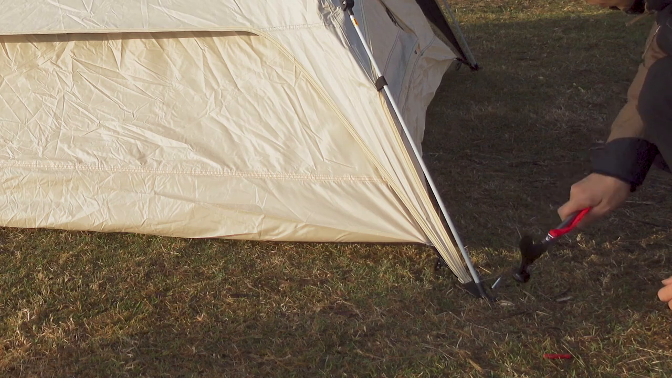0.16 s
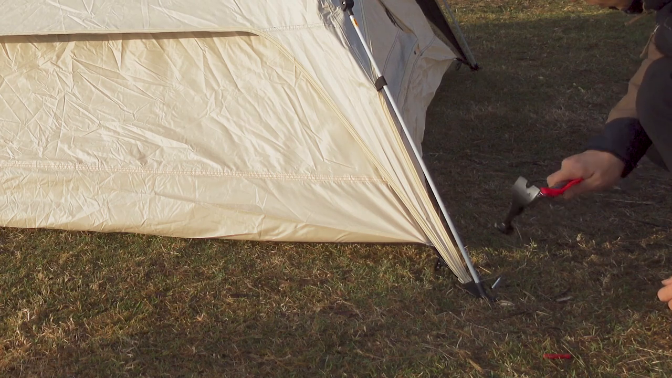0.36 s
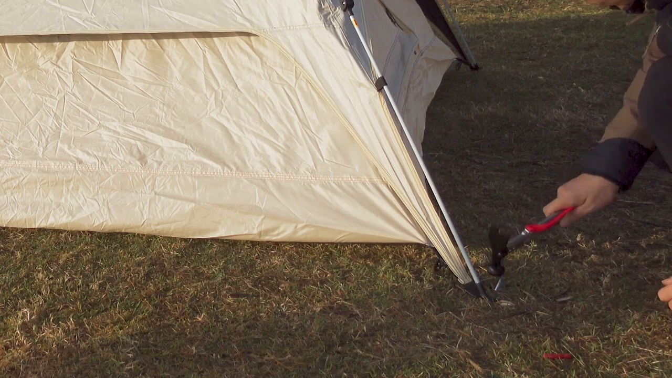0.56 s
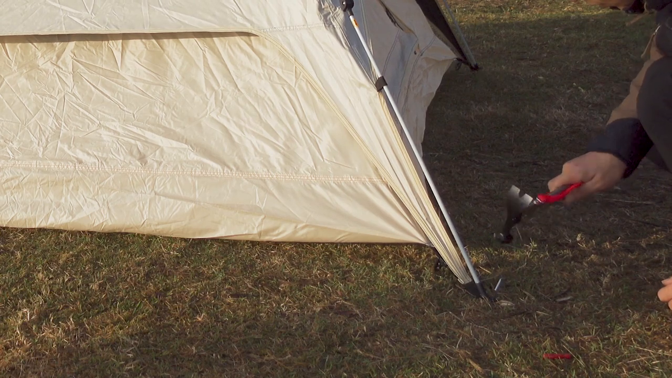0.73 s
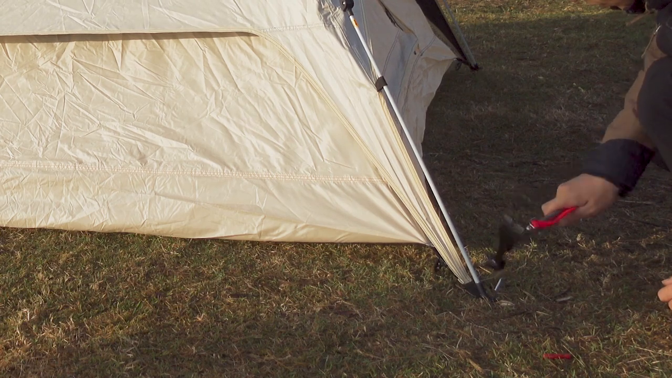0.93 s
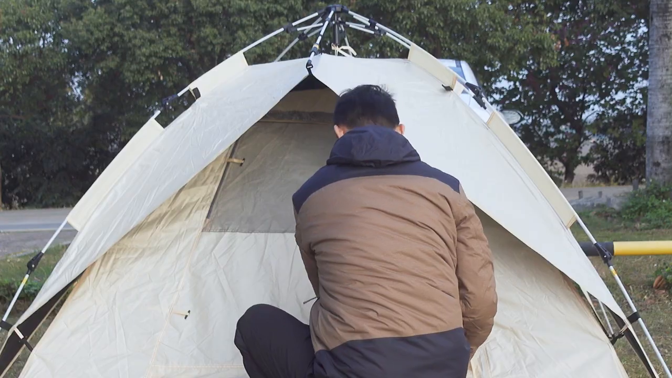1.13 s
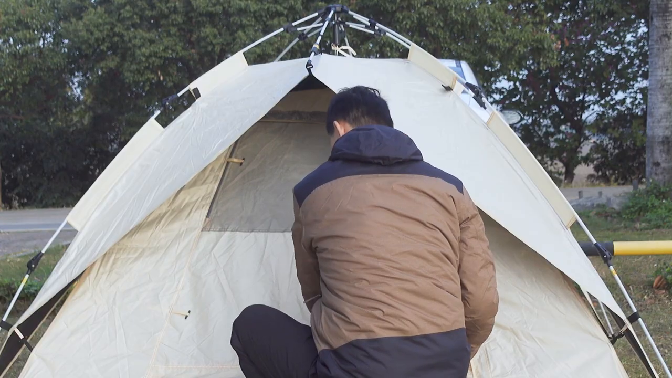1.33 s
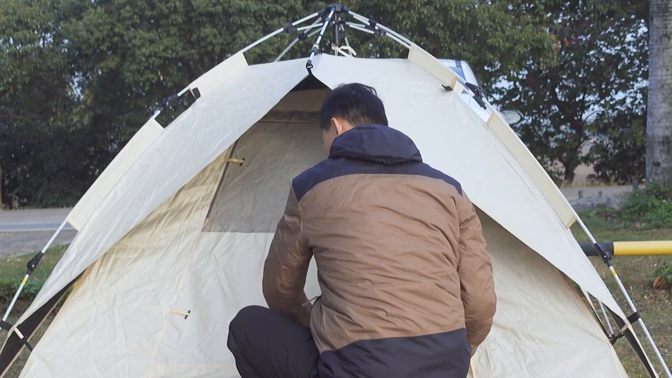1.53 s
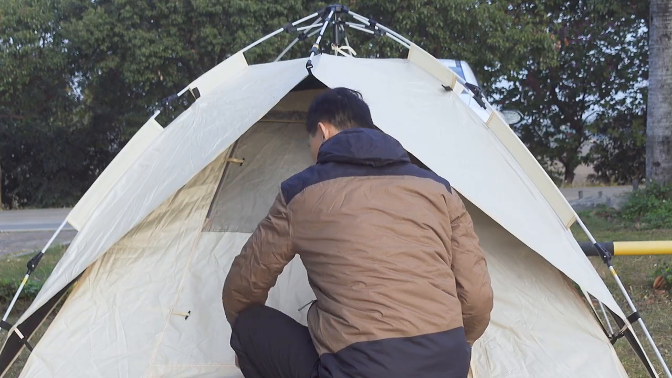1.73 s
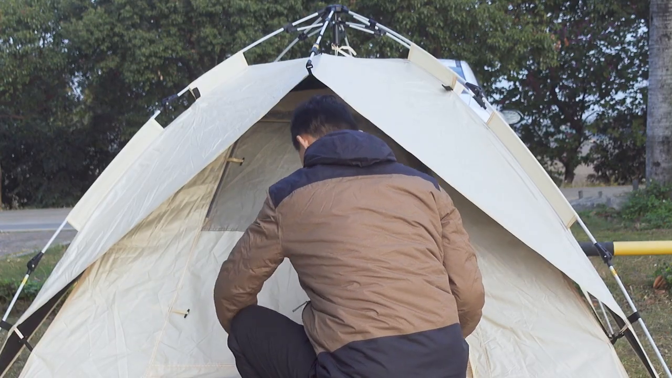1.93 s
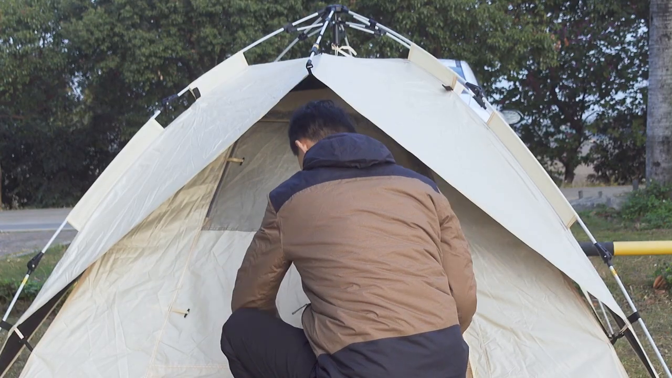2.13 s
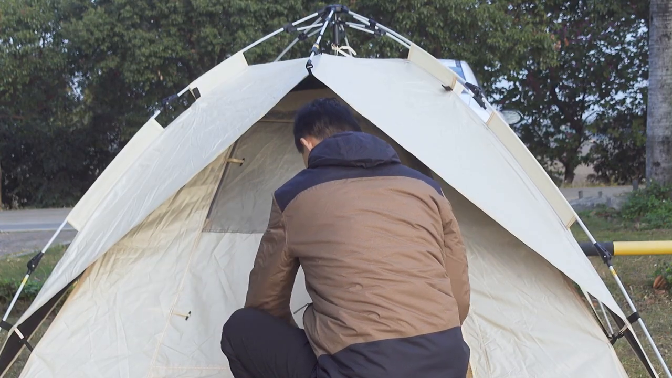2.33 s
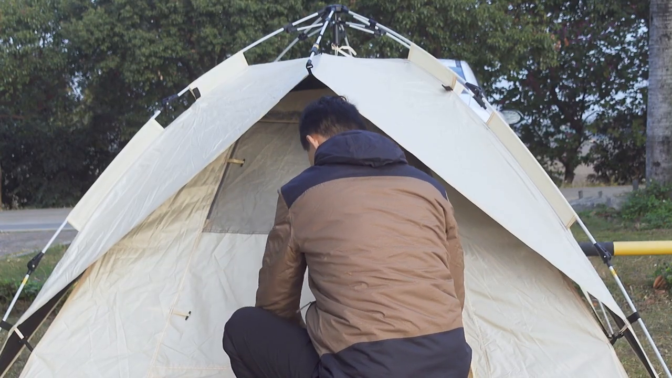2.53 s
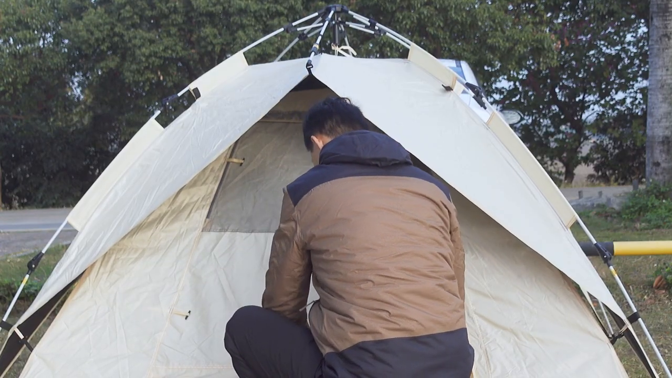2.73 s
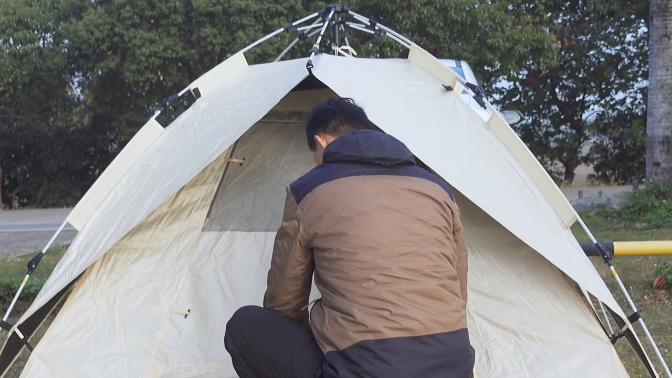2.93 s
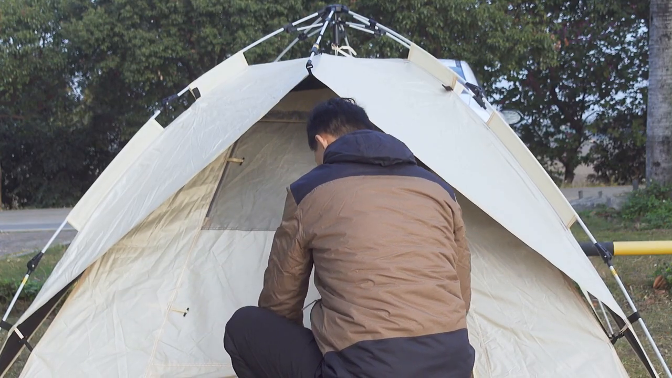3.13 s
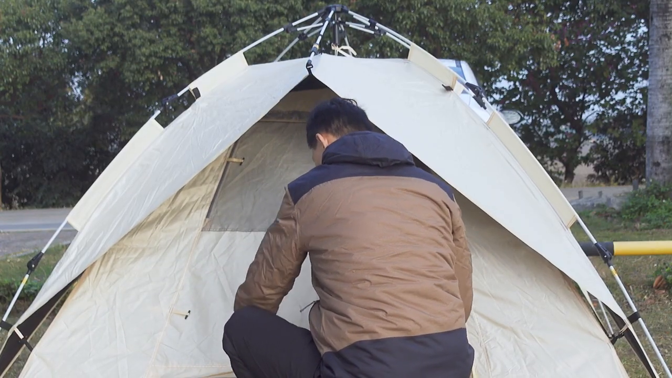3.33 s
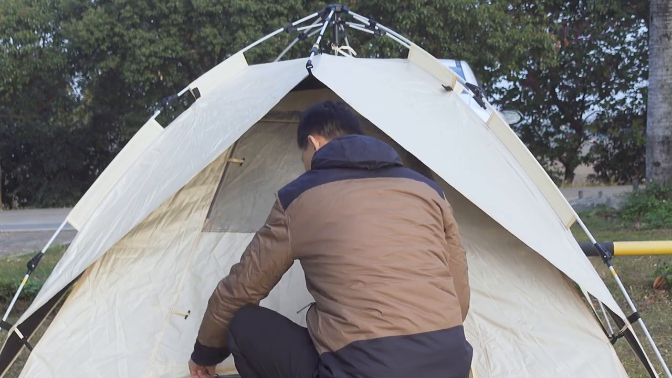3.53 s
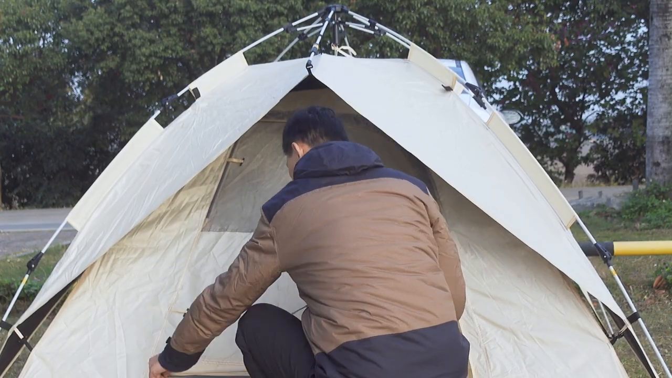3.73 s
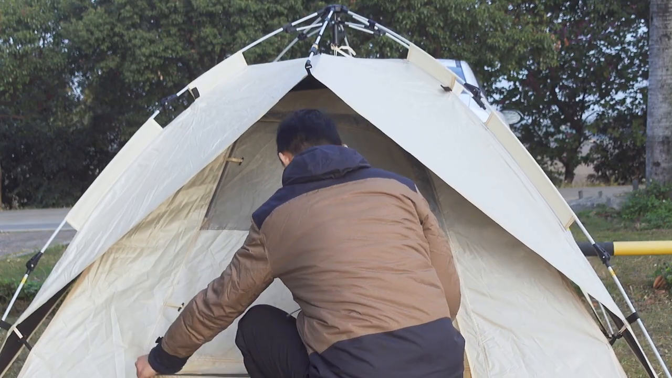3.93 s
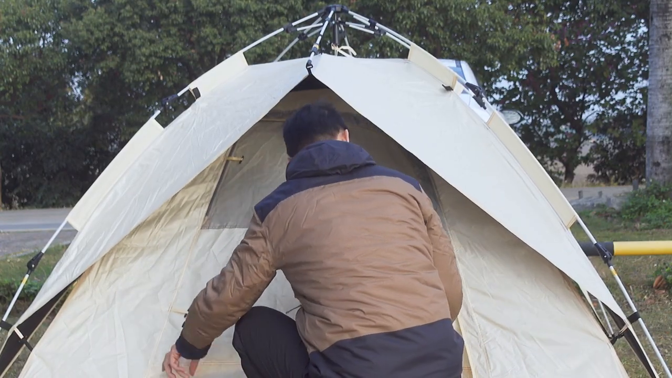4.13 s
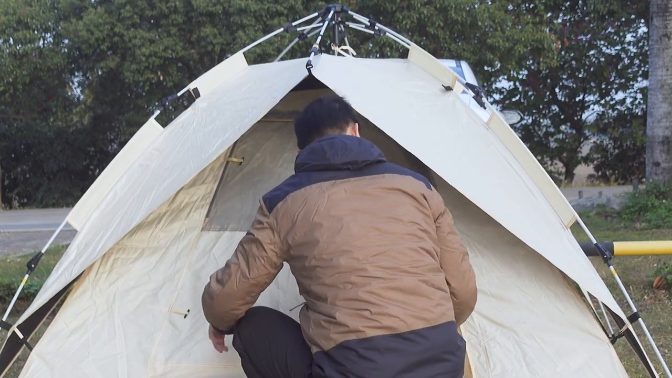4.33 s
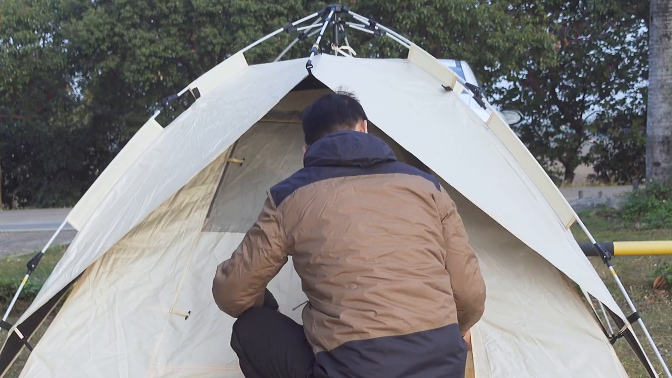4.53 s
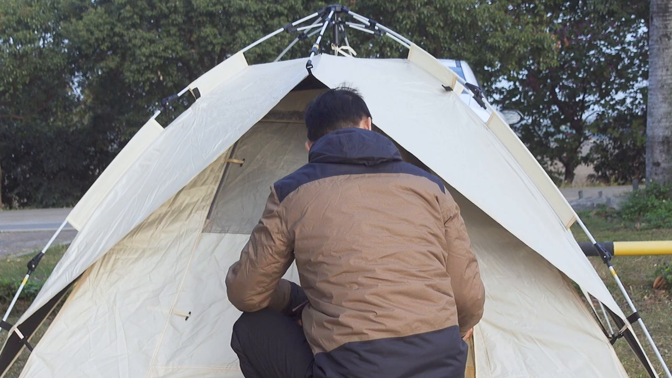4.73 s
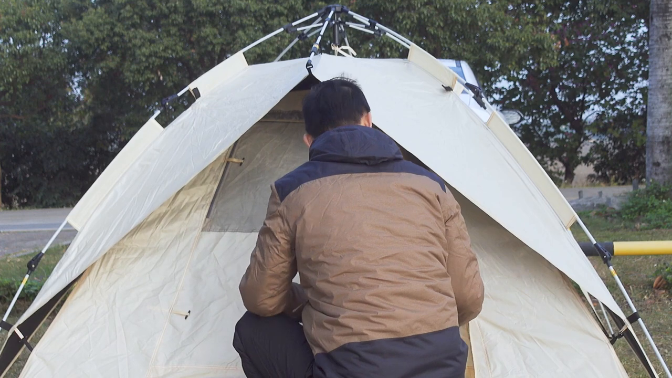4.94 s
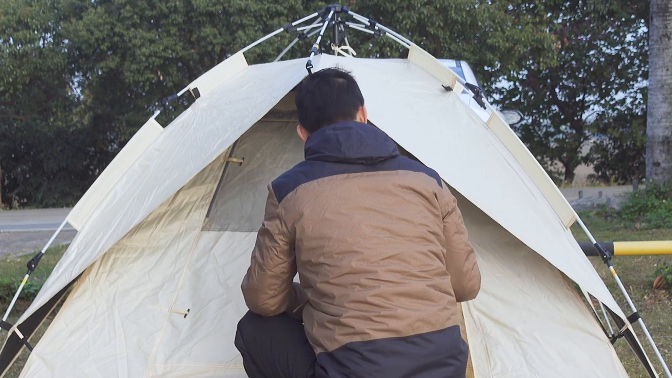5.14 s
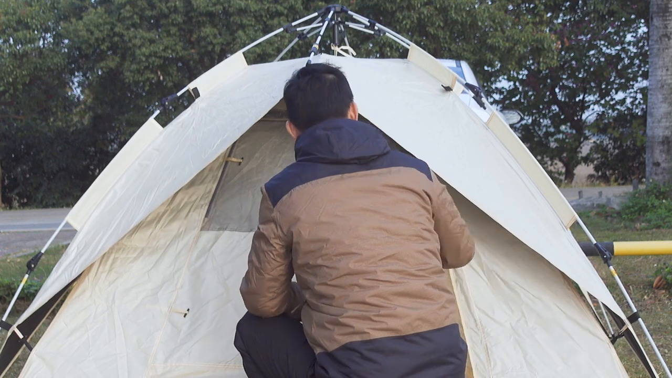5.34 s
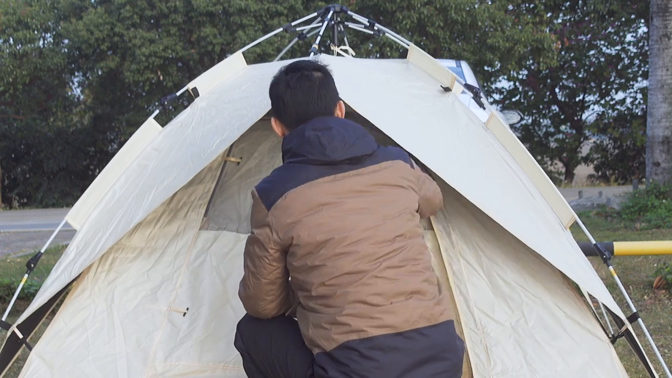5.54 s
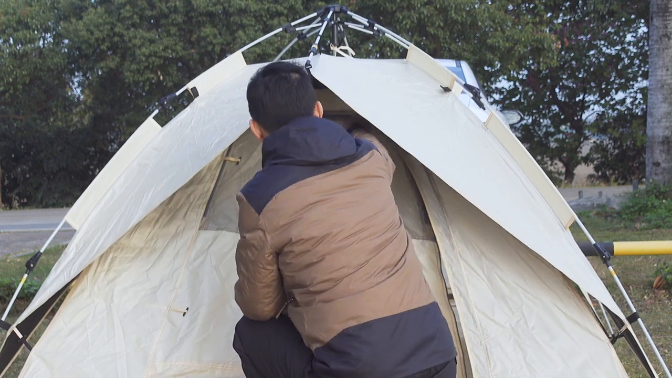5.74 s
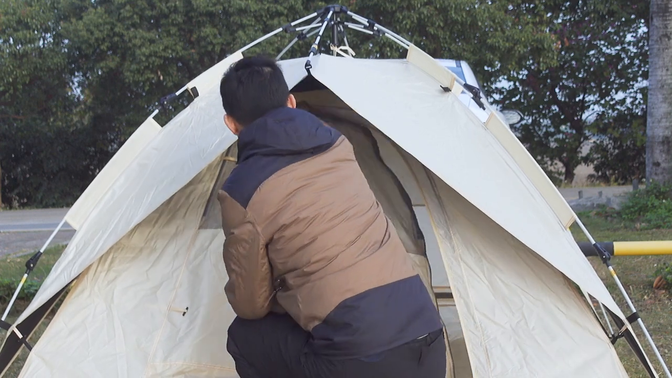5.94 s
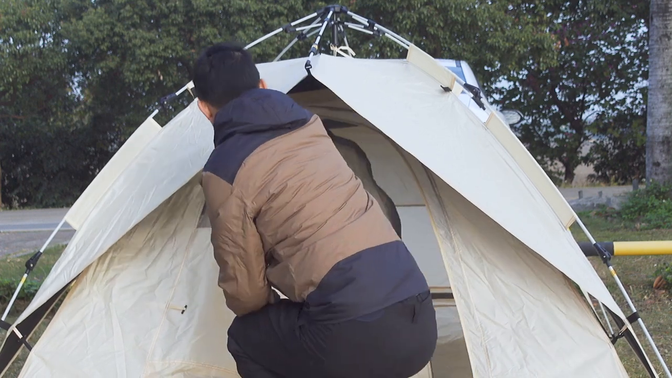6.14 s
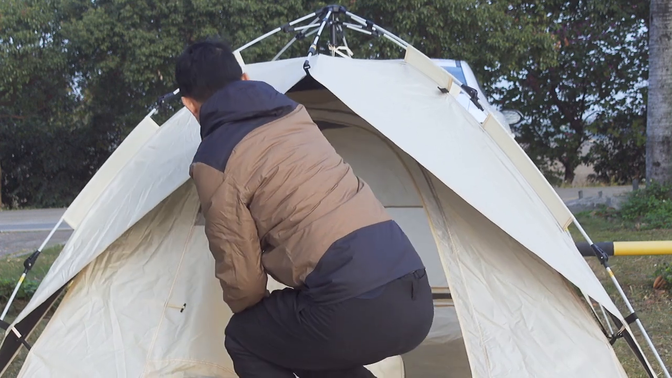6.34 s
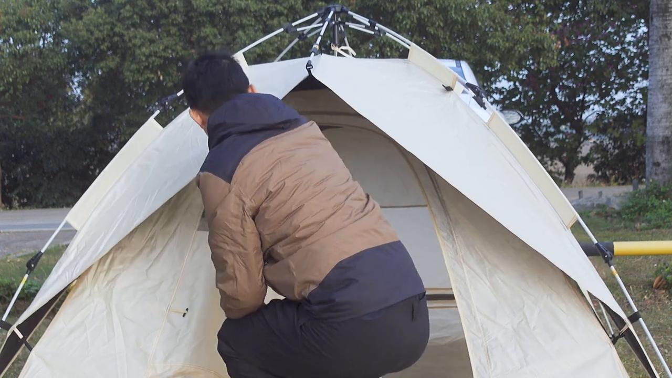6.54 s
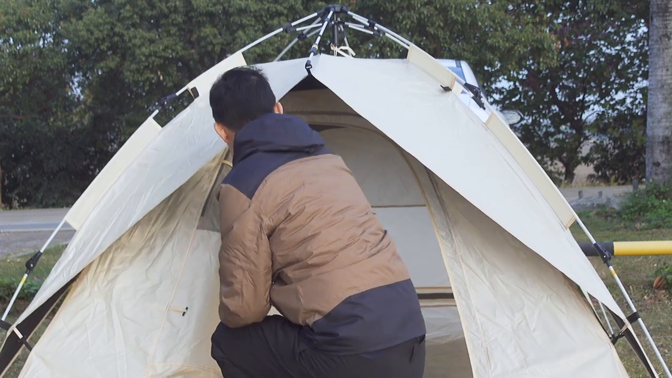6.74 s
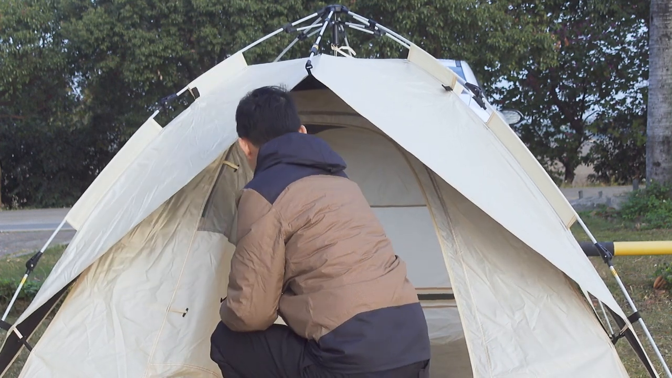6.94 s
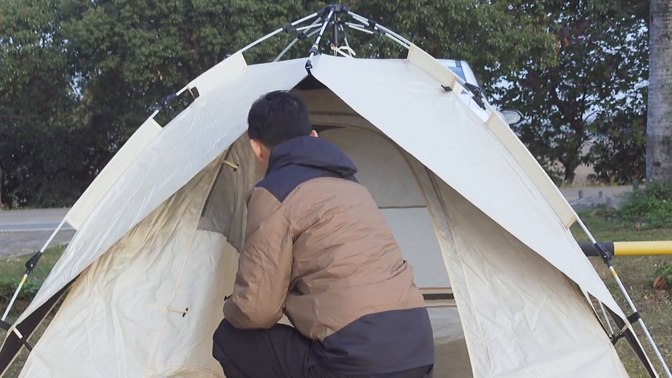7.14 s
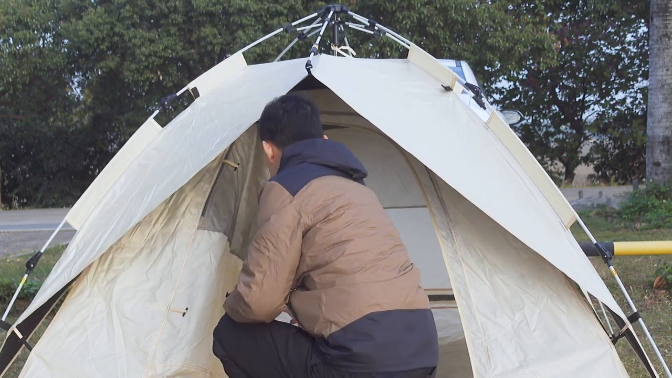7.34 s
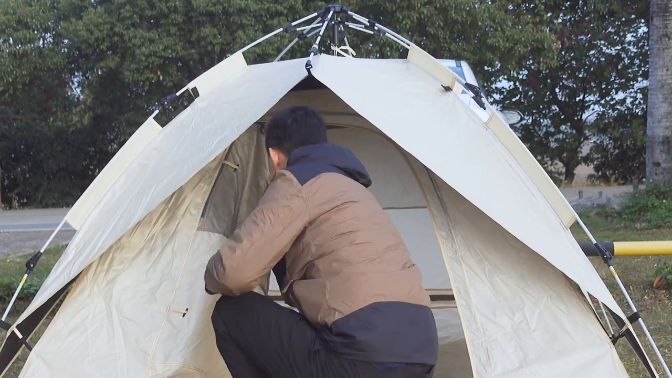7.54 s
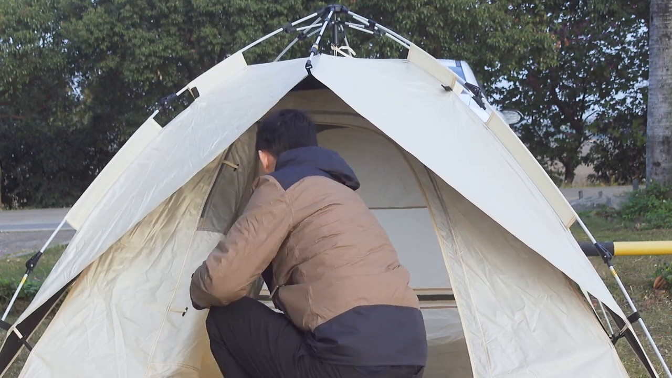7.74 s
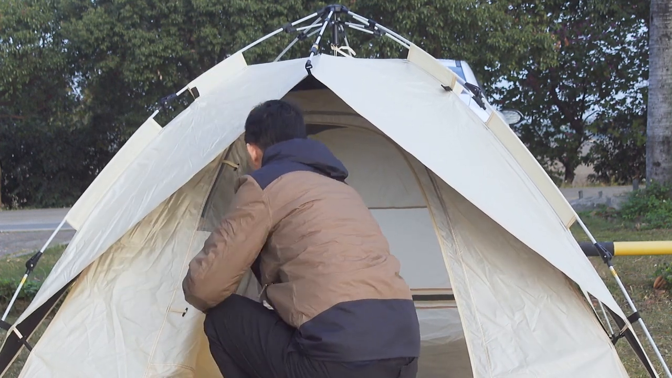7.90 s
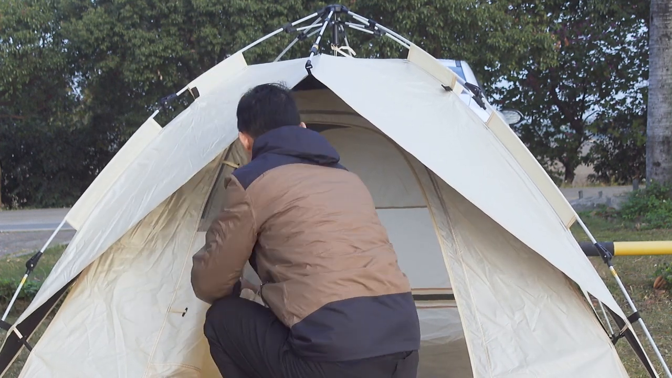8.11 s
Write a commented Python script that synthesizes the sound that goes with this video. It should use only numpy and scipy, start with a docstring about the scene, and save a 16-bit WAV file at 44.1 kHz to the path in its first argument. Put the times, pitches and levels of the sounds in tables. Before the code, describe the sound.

A faint low outdoor rumble runs throughout, with a few light puffs of wind on the microphone in the first second. A steel hammer strikes a metal tent stake three times, close and loud, at about 0.2, 0.6 and 1.1 seconds. Each blow gives a sharp crack, a slight thud and a bright ring, the last cut short. The rest is much quieter. From 1.2 to 1.7 seconds a tent zipper buzzes, rising in pitch. Nylon swishes and rubs under hands and sleeves, with small ticks around 2.5 seconds. A second zipper pull runs from 3.3 to 3.9 seconds, followed by crinkling and light snaps. The third, longest pull lasts from about 5.1 to 6.3 seconds, slowing as it finishes. Soft fabric rustling continues, with a sharper tick and crinkle around 8 seconds.

```python
"""A low outdoor rumble and a few puffs of wind open the scene, with a metal tent stake already ringing.
A steel hammer drives the stake into turf: three close blows, each a crack, a thud and a ring.
From about 1.2 s the tent door is unzipped in three pulls, the slider buzzing over the teeth.
Between and after the pulls, hands and sleeves make the nylon swish, groan, crinkle and tick,
while the rumble carries on to the end."""
import sys
import numpy as np
from scipy import signal
from scipy.fft import rfft, irfft
from scipy.io import wavfile
from scipy.ndimage import uniform_filter1d

SR = 44100
rng = np.random.default_rng(int(sys.argv[2]) if len(sys.argv) > 2 else 0)


def int16_out(signal):
    """Quantize to a 16-bit WAV file."""
    q = np.round(np.clip(np.atleast_2d(signal).T, -1, 1) * 32767)
    wavfile.write(sys.argv[1], SR, q.astype(np.int16))


N = 360297
T = np.arange(N) / SR

# The three zip pulls, one list of rows each. Effort is how much harder than usual the hand pulls;
# bite is how hard a crooked slider digs in: t/s, tooth rate/Hz, effort/dB, bite/dB
ZIP_PULLS = [
    [(1.24, 175, -2.5, 3.5), (1.32, 292, -3, 2.5), (1.4, 350, 1, 1.5), (1.46, 466, 1, -2.5),
     (1.525, 625, 2.5, -1), (1.575, 660, -0.5, 3.5), (1.6, 740, 1, 9), (1.64, 790, 2, 4.5),
     (1.69, 830, -2.5, 3)],
    [(3.25, 270, -5, 2), (3.29, 350, 0, -2.5), (3.355, 470, 4, 0.5), (3.42, 585, 0.5, 4),
     (3.5, 594, -1.5, 8), (3.55, 540, 0.5, 0.5), (3.65, 505, 1, 0), (3.85, 403, -2.5, -0.5),
     (3.915, 455, -1.5, 1.5), (3.94, 480, -11, 0)],
    [(5.118, 320, -12.5, 7.5), (5.19, 464, -2.5, 5.5), (5.32, 650, -1.5, 3), (5.41, 700, -1.5, 4),
     (5.46, 760, .5, -7), (5.51, 726, 0, -5.5), (5.57, 794, 0, -10), (5.61, 690, -3, 4.5),
     (5.67, 750, 0.5, -10), (5.75, 537, -2.5, 0), (5.96, 718, -4.5, 3.5), (6.2, 495, -5, 1.5),
     (6.29, 246, -9.5, -4)],
]


def undb(db):
    """Turn decibels into a factor to multiply by."""
    return 10 ** (np.asarray(db) / 20)


def unit(x):
    """Scale a signal to an average (rms) level of 1."""
    return x / np.sqrt(np.mean(x ** 2))


def gains(points, size):
    """Turn (f/Hz, level/dB) points into a gain for each FFT frequency, falling steeply past the ends."""
    hz, db = np.transpose(points)
    octave = np.log2(np.maximum(np.fft.rfftfreq(size, 1 / SR), 1))
    known = np.log2(hz)
    outside = np.abs(octave - np.clip(octave, known[0], known[-1]))
    return undb(np.interp(octave, known, db) - np.minimum(40 * outside, 80))


def colour(x, points):
    """Shape the tone of x with (f/Hz, level/dB) points; the result has level 1."""
    return unit(irfft(rfft(x) * gains(points, len(x)), len(x)))


def band(size, lo_hz, hi_hz):
    """Noise between two frequencies, at level 1."""
    return colour(rng.standard_normal(size), [(lo_hz, 0), (hi_hz, 0)])


def fade(t, t60):
    """Die away by 60 dB every t60 seconds."""
    return np.exp(-np.log(1000) * t / max(t60, 1e-4))


def walk(rate):
    """Wander at random by about 1 either way, turning `rate` times a second."""
    hold = max(int(SR / rate), 2)
    steps = np.repeat(rng.standard_normal(N // hold + 1), hold)
    return unit(uniform_filter1d(steps, hold)[:N])


def grains(rate, spread_db):
    """A patter of tiny clicks of very uneven size, about `rate` a second, at level 1."""
    size = undb(spread_db * np.minimum(rng.exponential(size=N), 5))
    return unit((rng.random(N) < rate / SR) * rng.standard_normal(N) * size)


def swell(start, length, rise_share=0.27, fall_share=0.37):
    """The rise, hold and fall of one stroke or gust."""
    along = (T - start) / length
    return np.clip(np.minimum(along / rise_share, (1 - along) / fall_share), 0, 1)


def controls(pulls):
    """Turn pulls into curves: a gate (1 during a pull, 0 outside), then each column after the time."""
    gate = sum(1. * ((T >= rows[0][0]) & (T <= rows[-1][0])) for rows in pulls)
    times, *columns = np.vstack(pulls).T
    return [uniform_filter1d(gate, size=400)] + [np.interp(T, times, column) for column in columns]


def add(out, s, sound):
    """Mix a sound into out, starting at s seconds."""
    start = int(round(s * SR))
    sound = sound[max(-start, 0):N - start]
    out[max(start, 0):max(start, 0) + len(sound)] += sound


def impact(points, size):
    """The shortest click with the given (f/Hz, level/dB) tone; its energy is 1."""
    cepstrum = irfft(np.log(gains(points, size)))
    # folding the second half onto the first packs the energy at the start
    cepstrum[1:size // 2] *= 2
    cepstrum[size // 2 + 1:] = 0
    click = irfft(np.exp(rfft(cepstrum)))
    return click / np.linalg.norm(click)


def outdoors(rumble_db=-54.0):
    """A distant rumble wavers a little, and a few puffs of wind nudge the microphone."""
    # tone of the rumble: f/Hz, level/dB
    rumble_tone = [(25, -24), (45, -8), (70, 0), (110, 0), (200, -2), (320, -9), (500, -18), (1000, -26),
                   (3000, -34), (8000, -38.5), (16000, -42)]
    # puffs of wind: start/s, length/s, level/dB
    gusts = [(0., 0.12, -47), (0.14, 0.11, -43.5), (0.24, .11, -52.5), (0.469, 0.14, -44),
             (.57, .13, -38.5)]
    waver_db = .4 * walk(2.5)
    rumble = colour(rng.standard_normal(N), rumble_tone) * undb(rumble_db + waver_db)
    wind = colour(rng.standard_normal(N), [(45, -18.5), (80, -6.0), (160, 0), (260, -8.0), (420, -15)])
    return rumble + wind * sum(undb(db) * swell(start, length) for start, length, db in gusts)


def nylon_strokes(from_s=1.11, pops_db=-5, buckle_db=2.3):
    """With each stroke, folds buckle in soft pops while the weave slides over itself with a fine hiss."""
    # hands and sleeves brushing the cloth, plus one short loud burst as the zip slider catches at 1.69 s:
    # start/s, length/s, swish/dB, crumple/dB, sheen/dB
    strokes = [(1.185, 0.15, -58, -67, -58), (1.691, 0.045, -45.5, -42, -52),
               (1.71, 0.2, -54.5, -51.5, -57), (1.855, 0.16, -56.5, -64, -57),
               (1.993, 0.4, -50, -54.5, -54), (2.267, 0.26, -53, -54.5, -55),
               (2.392, 0.46, -54.5, -56, -59), (2.787, 0.19, -57.5, -57, -62),
               (2.945, 0.2, -61.5, -51.5, -65), (3.141, 0.19, -49.5, -52, -53),
               (3.904, 0.13, -61, -59.5, -64), (3.99, 0.5, -62, -60, -65), (4.587, 0.55, -51.5, -57, -53),
               (6.175, 0.19, -63, -54, -67), (6.378, 0.31, -64.5, -60.5, -77),
               (6.665, 0.21, -61.5, -60, -70), (7.006, 0.23, -67.5, -63, -78),
               (7.235, 0.15, -63.5, -64, -65.5), (7.429, 0.32, -52.5, -56, -59),
               (7.665, 0.28, -58.5, -64, -62), (7.83, 0.46, -53, -53, -57)]
    # the cloth never lies quite still between strokes: swish/dB, crumple/dB, sheen/dB
    resting_db = (-66, -65, -71)
    # dull crumple of the folds: f/Hz, level/dB
    crumple_tone = [(180, 8), (330, 0), (750, -2.5), (1400, -1.5), (2000, -14), (3500, -8.5)]
    # swish of the sliding weave: f/Hz, level/dB
    swish_tone = [(1000, -2), (1700, -3), (1940, -4.5), (2670, -2.5), (2990, -2), (3240, -1.5),
                  (3990, -4.5), (5610, 0.5), (7950, 0), (10000, -9.5), (13000, -25), (22000, -120)]
    # sheen, the very high hiss of the fibres: f/Hz, level/dB
    sheen_tone = [(8000, 0), (9500, -0.5), (11500, 3), (13000, 2), (14700, 9.5), (16000, -8)]
    power = np.outer(undb(resting_db), T > from_s) ** 2
    for start, length, *levels in strokes:
        power += np.outer(undb(levels), swell(start, length)) ** 2
    swish, crumple, sheen = np.sqrt(power)
    drag = undb(.8 * walk(50))
    pops = undb(pops_db) * grains(260, 2.6)
    folds = colour(pops + rng.standard_normal(N), crumple_tone) * crumple * undb(buckle_db * walk(35))
    weave = colour(grains(12000, 3.9) + 1.1 * rng.standard_normal(N), swish_tone) * swish * drag
    fibres = colour(rng.standard_normal(N), sheen_tone) * sheen * drag
    pulling = controls(ZIP_PULLS)[0]
    return (1 - pulling) * (folds + weave + fibres)  # silent while the zip moves


def nylon_rubs(width=0.08):
    """A hand or sleeve sticks and slips on the tight panel, which groans around one pitch."""
    # short groans: middle t/s, length/s, f/Hz, level/dB
    groans = [(2.21, 0.12, 1390, -52), (3.037, 0.089, 300, -50), (4.774, 0.24, 760, -55.5),
              (7.61, 0.12, 2700, -53)]
    out = np.zeros(N)
    for middle, length, hz, db in groans:
        arch = np.clip(1 - np.abs(T - middle) / (length / 2), 0, 1) ** .5
        resonance = [(hz / (1 + width), -5), (hz, 0), (hz * (1 + width), -5)]
        out += undb(db) * arch * colour(grains(3000, 2), resonance)
    return out


def crinkles(creases_per_s=60, spread_db=1.5, crease_t60=.02):
    """Small creases give way at random while the cloth is handled, each a short dull puff."""
    # stretches of crinkling: start/s, end/s, level of a typical crease/dB
    stretches = [(2.859, 3.099, -50), (4.07, 4.55, -54), (6.4, 7.45, -55.5), (7.55, 8.02, -52.5),
                 (8.05, 8.17, -42.5)]
    # tone of a small crease: f/Hz, level/dB
    crinkle_tone = [(350, -8), (700, 6), (1200, 1), (2000, -3), (3300, -5.5), (6000, -18)]
    handling = sum(undb(db) * ((T > start) & (T < end)) for start, end, db in stretches)
    kicks = (rng.random(N) < creases_per_s / SR) * undb(spread_db * rng.standard_normal(N))
    # the filter gives each kick a fading tail
    puffs = signal.lfilter([1], [1, -fade(1 / SR, crease_t60)], handling * kicks + 1e-18)
    return puffs * colour(rng.standard_normal(N), crinkle_tone)


def ticks(snap_t60=0.0088, flap_t60=0.026, tail_db=-24, tail_t60=0.16):
    """A crease or zip tab snaps, the cloth around it flaps, and the tent wall adds a short tail."""
    # the snaps that stand out: t/s, level/dB, flap compared with snap/dB, top of the snap/Hz
    snaps = [(1.363, -33.5, -10, 9000), (1.7035, -37.5, -0.5, 12000), (1.899, -39, -28, 15500),
             (2.518, -36.5, -26, 9800), (2.5414, -30.5, -29, 15500), (2.9295, -39.5, -7, 5250),
             (2.979, -37.5, -12, 11900), (3.9926, -43.5, 7, 3370), (4.034, -41.5, -9, 5900),
             (4.0664, -41, -6, 6000), (4.104, -39, -5, 3800), (4.1121, -38, -6, 4400),
             (4.1788, -41, -6, 5060), (4.2368, -45, 4, 3400), (4.337, -44, -20, 7440),
             (4.5052, -48, -20, 7330), (5.8101, -37, -4, 5000), (6.5935, -44.5, -14, 7500),
             (6.7262, -48, 10, 3400), (7.0953, -44, 0.5, 3400), (7.195, -53, 4, 3440),
             (7.248, -49.5, 5.5, 3370), (7.3584, -43, -1.5, 4000), (7.4022, -47, -0.5, 3400),
             (7.7078, -52.5, 11.5, 3400), (7.9837, -26.5, -13, 7340), (8.048, -34.5, -0.5, 5500)]
    out, t = np.zeros(N), T[:4096]
    for start, db, flap_db, top_hz in snaps:
        snap = band(len(t), 1560, top_hz) * (fade(t, snap_t60) + undb(tail_db) * fade(t, tail_t60))
        flap = undb(flap_db) * band(len(t), 240, 1020) * fade(t, flap_t60)
        add(out, start, undb(db) * (snap + flap))
    return out


def zipper(buzz_db=-46.5, zing_db=-48.0, rasp_db=-48, flutter_db=4.0, usual_hz=550):
    """The slider buzzes over slightly uneven teeth, and each tooth adds a little rasp and hiss."""
    # zing, the resonances that shape the overtones of the buzz: f/Hz, level/dB
    zing_tone = [(500, 0.5), (800, 5), (1150, 2), (1600, 0.5), (1900, 0), (2300, 0), (2900, 1.5),
                 (3400, -0.5), (4200, -6), (5500, -3)]
    # rasp of the scraping teeth: f/Hz, level/dB
    rasp_tone = [(250, -3), (450, 4), (800, 1), (1200, 4.5), (1800, -1.5), (2400, -0.5), (3500, 3.5),
                 (4300, -18), (5500, -7)]
    # high hiss of the slider: f/Hz, level/dB
    hiss_tone = [(3000, -27), (4300, -1.5), (5500, -0.5), (8600, -3.5), (10500, -8), (13000, -5),
                 (14600, 1), (15800, -11)]
    # the loose door panel, one row for each pull: base hiss/dB, base waver/radians
    panel = [(-49.5, 0.23), (-49, 0.28), (-51.5, 0.23)]
    gate, tooth_hz, effort, bite = controls(ZIP_PULLS)
    pull_number = np.digitize(T, [rows[0][0] for rows in ZIP_PULLS[1:]])
    hiss_db, slack = np.array(panel)[pull_number].T
    uneven_hz = tooth_hz * (1 + .012 * walk(80) + .022 * walk(600))
    phase = 2 * np.pi * np.cumsum(uneven_hz) / SR
    waver = slack * (1 - 0.5 * np.minimum(effort, 0))  # a weak pull stutters more
    # the flexing panel shakes each harmonic's strength and timing; high ones stray most in phase
    harmonics = [undb(flutter_db * walk(55)) * np.cos(k * phase + waver * k ** .75 * walk(130))
                 for k in range(1, 9)]
    # more bite trades buzz for overtones, which also stand out in a hard, fast pull
    buzz = unit(harmonics[0]) * undb(buzz_db + 1.9 * effort - 0.47 * bite)
    firmness_db = bite + 1.23 * effort + 2 * np.log2(tooth_hz / usual_hz)
    overtones = sum(undb(-1.43 * k) * harmonic for k, harmonic in enumerate(harmonics[1:]))
    zing = colour(gate * overtones, zing_tone) * np.sqrt(np.mean(gate)) * undb(zing_db + firmness_db)
    tooth_pulse = unit(1 + 0.32 * np.cos(phase))
    snag_db = 1.4 * walk(60)
    rasp = colour(tooth_pulse * grains(9000, 3.3), rasp_tone)
    rasp *= undb(rasp_db + effort + 0.12 * bite + snag_db)
    hiss = colour(tooth_pulse * rng.standard_normal(N), hiss_tone)
    hiss *= undb(hiss_db + 0.59 * effort + 1.2 * walk(60))
    return gate * (buzz + zing + rasp + hiss)


def steel_crack(t, tone, rebound_db, rebound_s=0.0037, chatter_t60=0.013, echo_t60=0.18):
    """Steel clicks and chatters on steel, the head lands again, and tent and ground echo faintly."""
    click = undb(6) * impact(tone, size=len(t))
    chatter = colour(rng.standard_normal(len(t)), tone) * fade(t, chatter_t60)
    rebound = undb(rebound_db) * np.interp(t - rebound_s, t, chatter, left=0)
    echo = undb(-30) * colour(rng.standard_normal(len(t)), tone) * fade(t, echo_t60)
    return click + chatter + rebound + echo


def hammer(ring_hz=2758, early_pitch=1.092, early_until_s=.5, thud_t60=0.033):
    """Each blow cracks, thuds in the soil and rings the stake, whose pitch depends on the soil's grip."""
    # The blows; the first lands before the scene opens: t/s, crack/dB, overtones/dB, middle tones/dB,
    # thud/dB, ring/dB, ring t60/s, beat/Hz, beat depth/0-1, rebound/dB, stopped after/s
    blows = [(-.16, -50.5, -32, -3, -45, -28, 0.87, 1.6, .85, -30, 0.31),
             (0.1565, -9.5, -7.5, -11, -24.5, -32.5, 1.3, 8.3, 0.57, -5, 0.23),
             (0.6332, -6, -13.5, -4.5, -34, -22.5, 0.86, 4.9, 0.66, -40.5, .41),
             (1.071, -4.5, -10, 4, -41, -37.5, 0.5, 5.2, 0.65, -18.5, 0.032)]
    # the stake's tones besides its main ring: f/Hz, level/dB, t60/s
    stake_tones = [(848, -27, .1), (3258, -10, .04), (3350, -21, .055), (5593, -24, .07), (5782, -14, .05),
                   (5810, -27, .13), (6385, -26, .1), (7170, -26, .15), (7232, -25, .16), (8040, -8, .052),
                   (8022, -32, .24), (9012, -18, .07), (9160, -1, .03), (10250, -6, .036),
                   (10280, -32, .19)]
    # the crack of steel on steel: f/Hz, level/dB
    crack_tone = [(100, -12.5), (400, -4.5), (1600, -9.5), (2100, -13), (2700, 0.5), (3700, 4),
                  (5000, -19.5), (5800, 5), (6800, 1), (9400, -0.5), (10900, -25), (13000, -11.5),
                  (16000, -15)]
    # middle tones that an off-centre blow weakens: f/Hz, share of the blow's middle-tone dB/0-1
    middle_shares = [(4800, 0.02), (5600, 0.72), (8200, 0.42), (9000, 0.09)]
    out, t = np.zeros(N), T[:2 ** 15]
    for (start, crack_db, overtones_db, middle_db, thud_db, ring_db,
         ring_t60, beat_hz, beat_depth, rebound_db, length) in blows:
        pitch = early_pitch if start < early_until_s else 1
        aim_db = lambda hz: middle_db * np.interp(hz, *np.transpose(middle_shares))
        tone = [(hz * pitch, db + aim_db(hz) / 2) for hz, db in crack_tone]
        crack = undb(crack_db) * steel_crack(t, tone, rebound_db)
        thud = undb(thud_db) * band(len(t), 820, 1400) * fade(t, thud_t60)
        blur = .35 * band(len(t), 20, 150)  # grit rubbing on the shaft blurs the overtones
        overtones = np.zeros(len(t))
        for k, (hz, db, t60) in enumerate(stake_tones):
            wave = (-1) ** k * np.sin(2 * np.pi * hz * pitch * t + blur)
            overtones += undb(overtones_db + db + aim_db(hz)) * wave * fade(t, t60)
        # the stake bends two ways at nearly the same pitch, so the ring throbs (beats)
        phase = 2 * np.pi * ring_hz * pitch * t
        pair = np.sin(phase) + beat_depth * np.sin(phase + 2 * np.pi * beat_hz * (t - .035))
        ring = undb(ring_db) * pair / 2 * fade(t, ring_t60)
        cutoff = np.clip((length - t) / .002, 0, 1)
        add(out, start, cutoff * (crack + thud + overtones + ring))
    return out


def scene():
    """Add all the sounds together in one channel."""
    return (hammer() + zipper() + nylon_strokes() + nylon_rubs() + ticks() + outdoors() + crinkles())[None]


def record(dry, top_hz=15900):
    """Clip the loudest peaks of the blows, then cut the highest treble."""
    low_pass = signal.ellip(8, .2, 70, top_hz, fs=SR, output="sos")
    return signal.sosfilt(low_pass, np.clip(dry, -1, 1))


dry = scene()
out = record(dry)
int16_out(out)
```